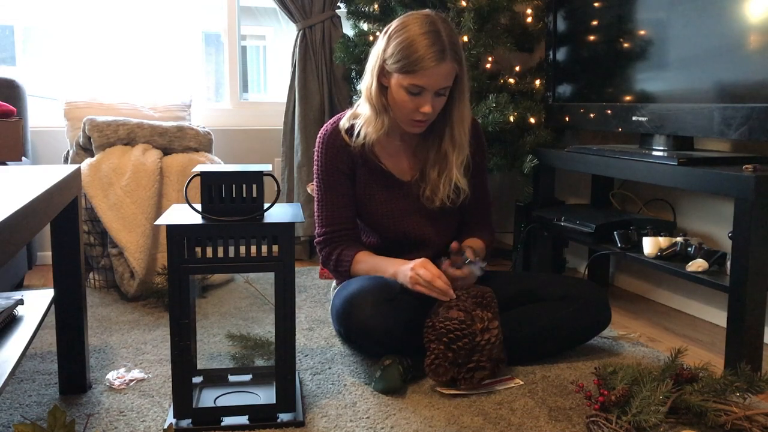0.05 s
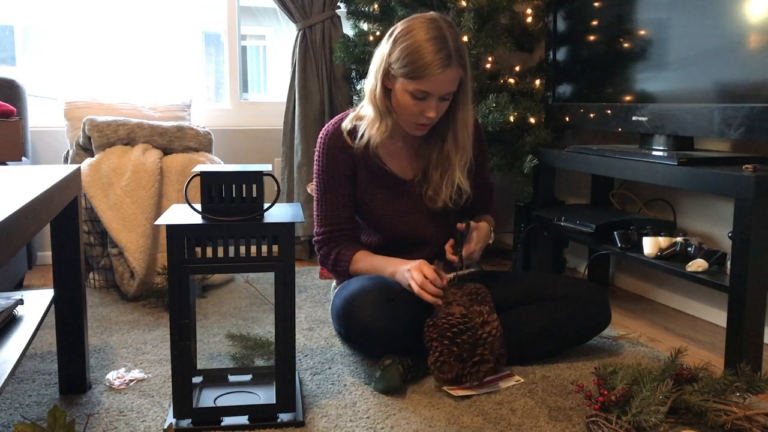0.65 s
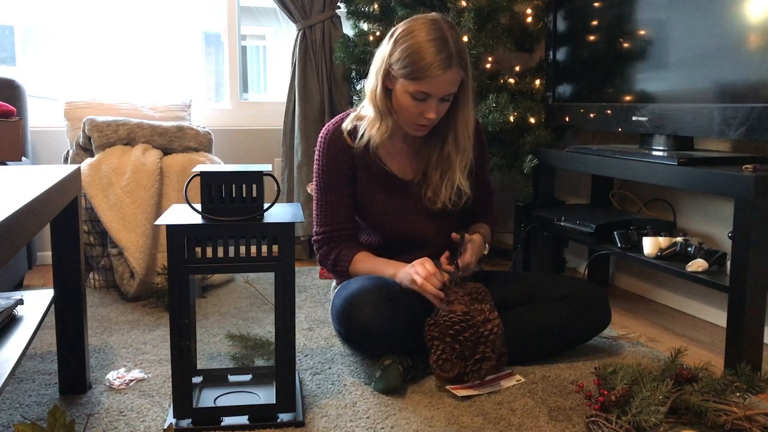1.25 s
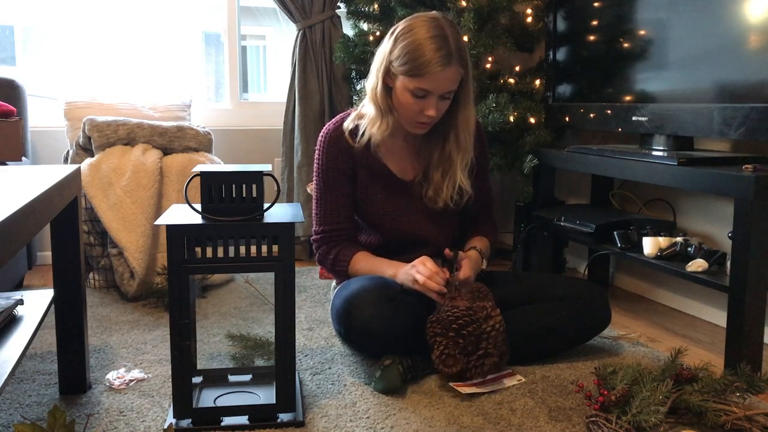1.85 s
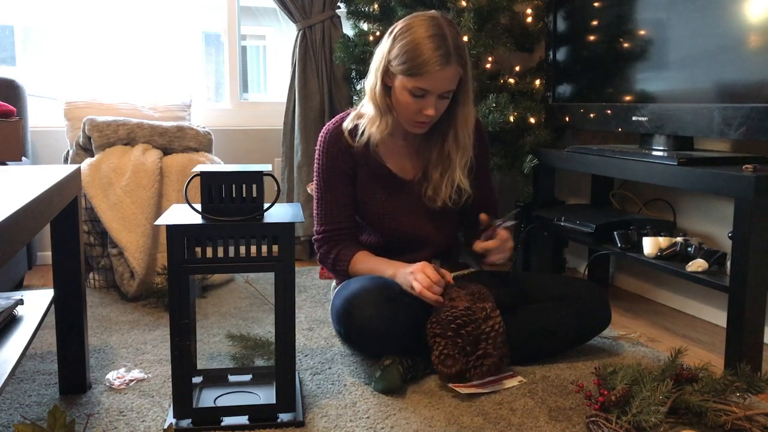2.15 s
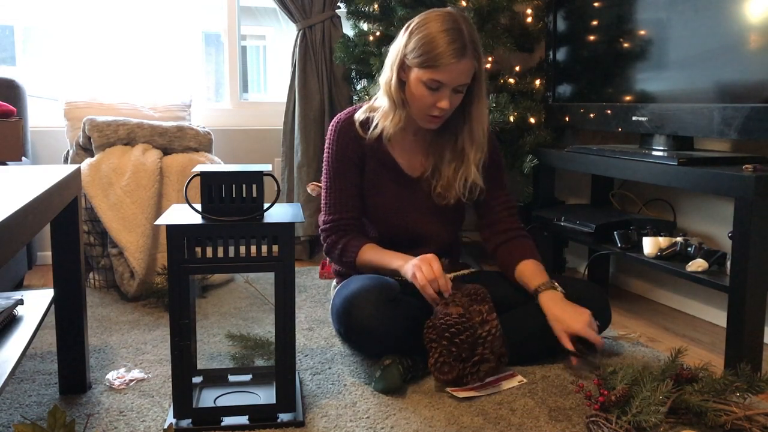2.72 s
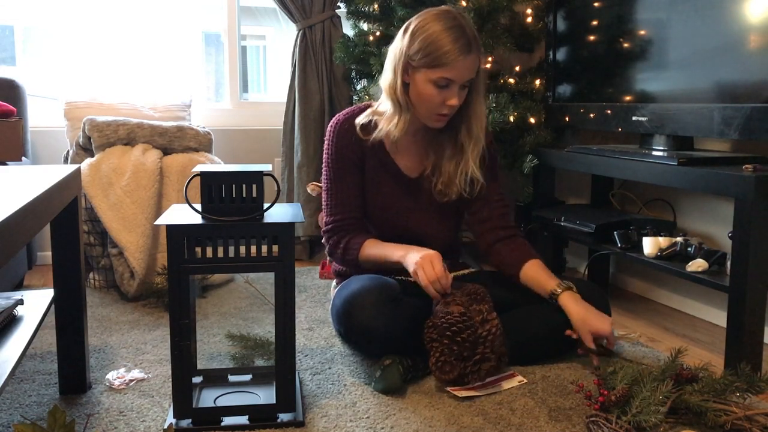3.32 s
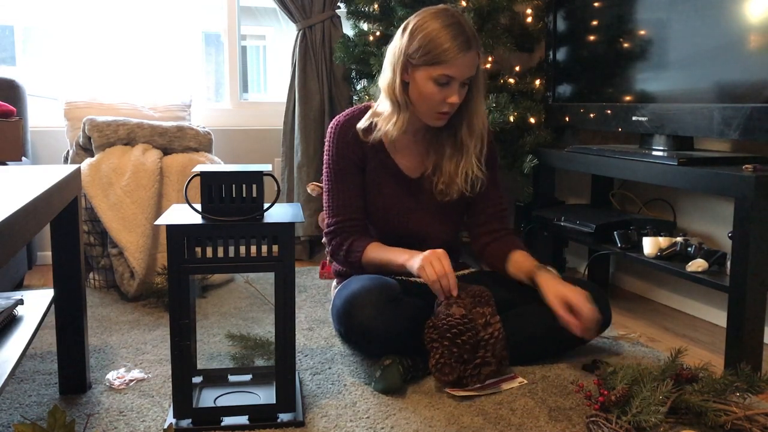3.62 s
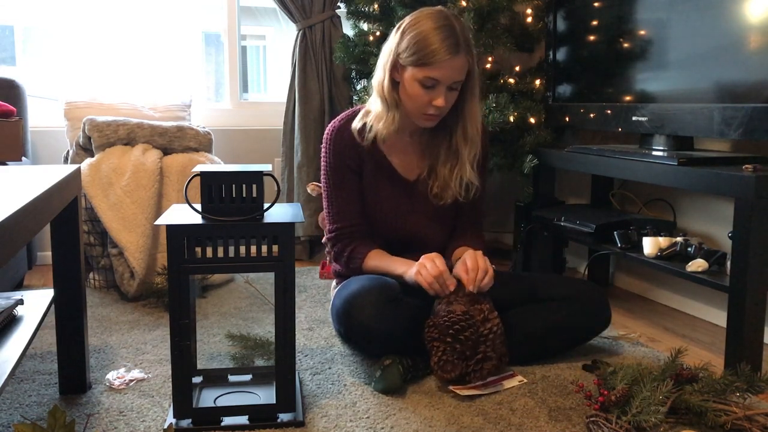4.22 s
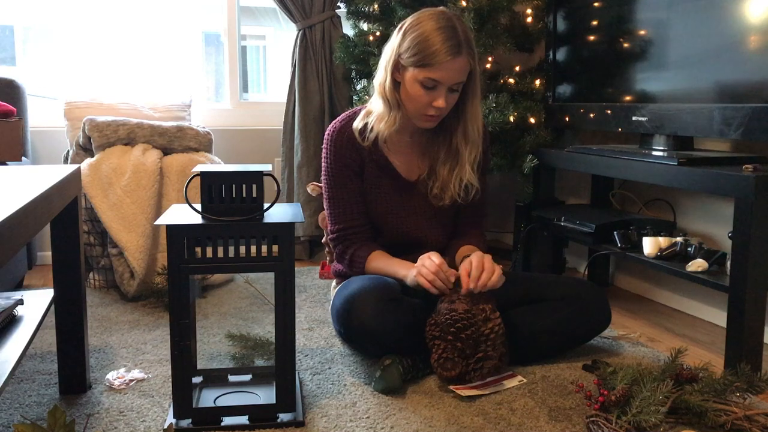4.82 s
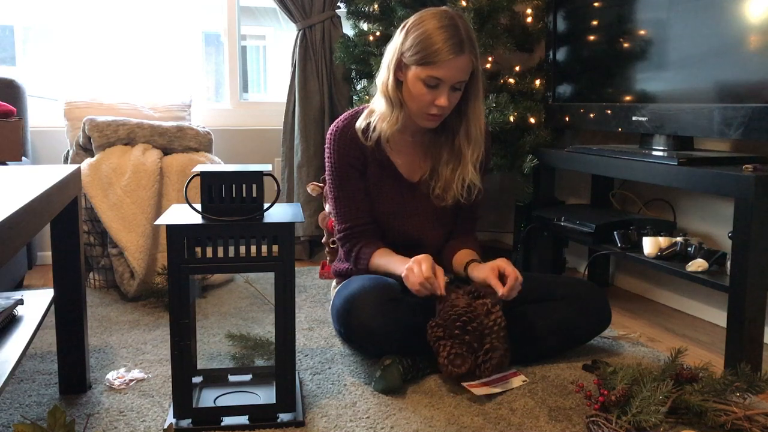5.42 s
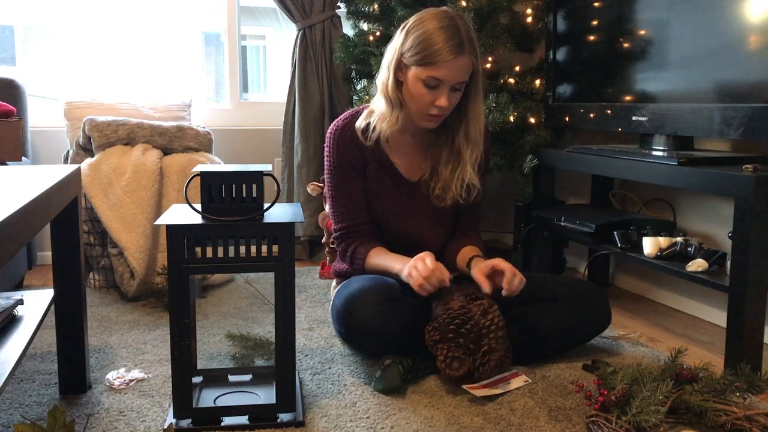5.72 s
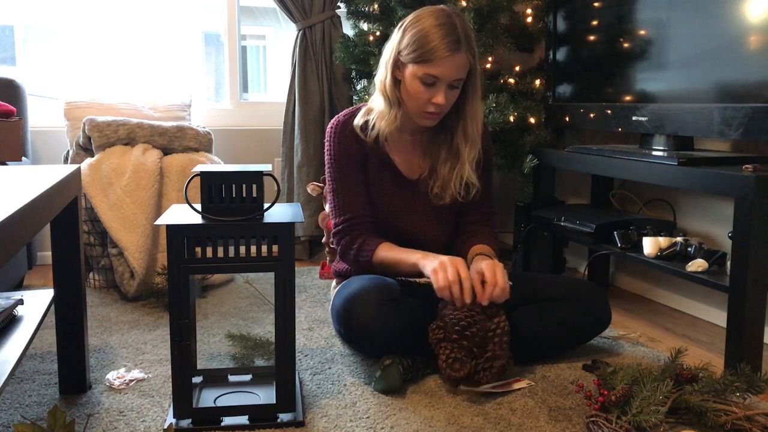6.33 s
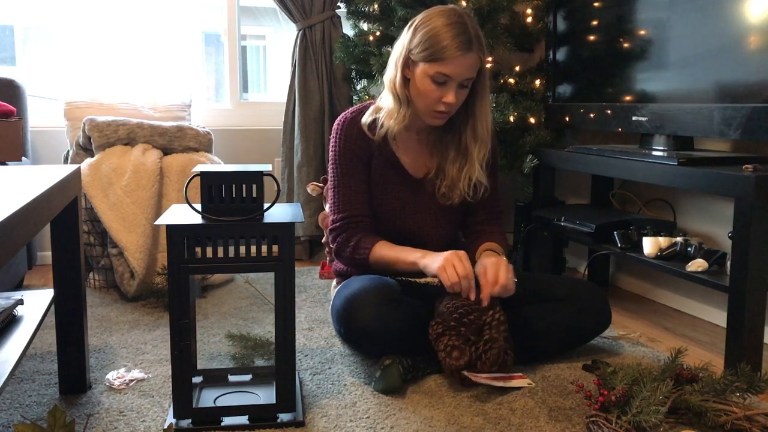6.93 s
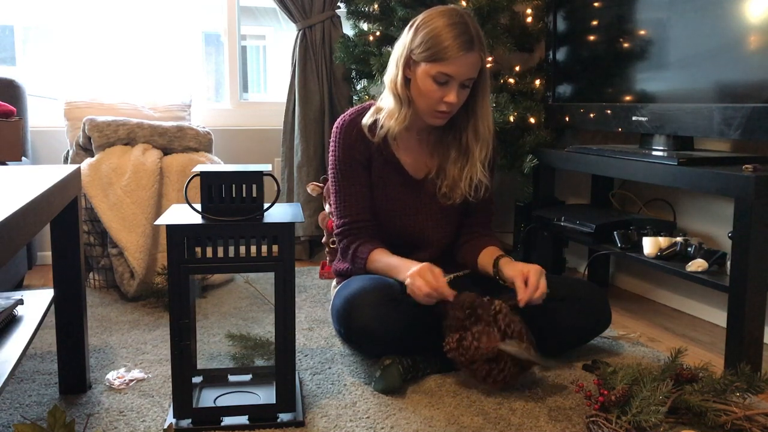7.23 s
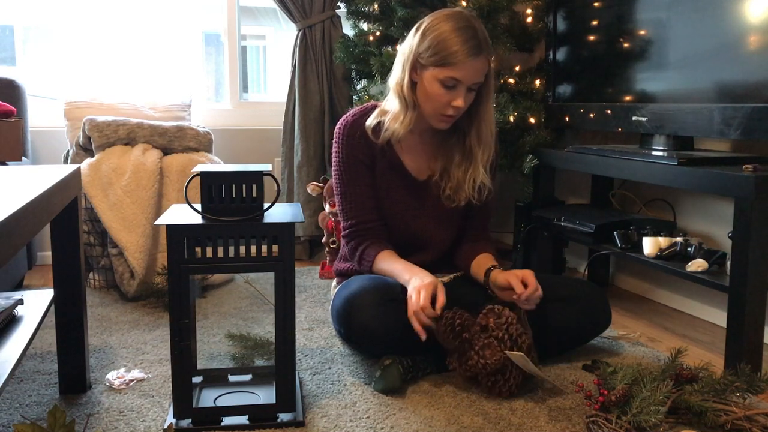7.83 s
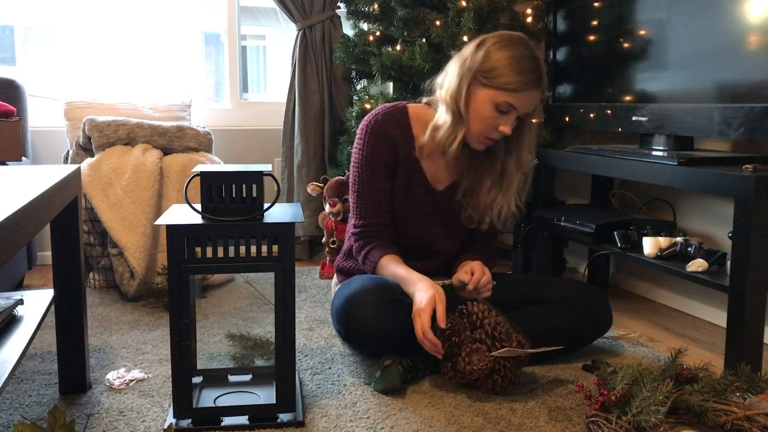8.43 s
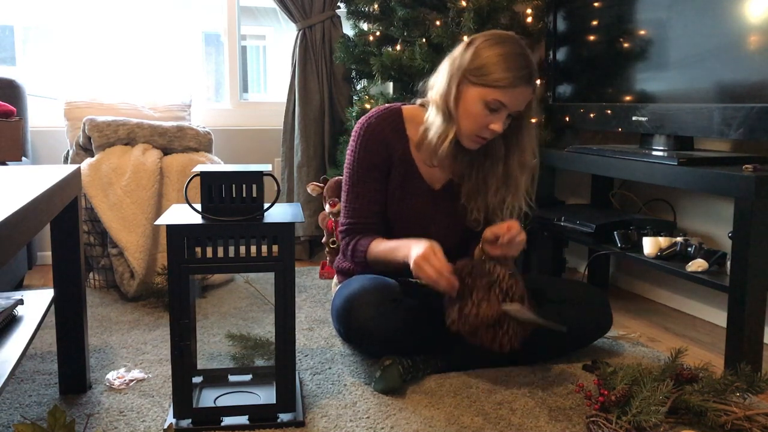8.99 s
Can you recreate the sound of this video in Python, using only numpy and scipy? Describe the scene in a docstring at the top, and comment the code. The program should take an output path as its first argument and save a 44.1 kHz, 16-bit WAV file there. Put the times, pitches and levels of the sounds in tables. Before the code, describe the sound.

A net bag of dry pine cones is handled softly and fairly nearby in a carpeted living room, over a faint hiss and a low, wavering hum. For the first four seconds there are scattered small snips, clicks and short scratchy rustles as scissors and fingers work at the knot, with a little cluster of clicks just before 3 seconds. Crisper snaps come at around 4.4 seconds. From 5.2 to 5.7 seconds a harder tug makes the mesh crackle over the scales while the cones shift. Lighter rustles and ticks follow. The loudest stretch runs from about 7.1 to 7.7 seconds: a quick run of bright, dry snaps and sizzling mesh, with the cones knocking softly together. It then eases into gentler rustling, a faint brush of sleeves and a few last clicks at around 9 seconds.

```python
"""Opening a net bag of pine cones

Someone snips at the knot of a net bag of dry pine cones, lays the scissors down and pulls the mesh open.
Strands and cone scales snap: each brief impulse excites a damped vibration and sets neighbours clattering.
The net crackles by stick-slip friction, the cones knock together, and sleeves and hands brush past.
A carpeted living room adds a short reverberation, a low wavering drone and faint hiss."""
import sys
import numpy as np
from scipy import signal
from scipy.fft import rfft, irfft
from scipy.io import wavfile

SR = 44100
rng = np.random.default_rng(int(sys.argv[2]) if len(sys.argv) > 2 else 0)


def transcribe(u):
    """Save the signal u as a 16-bit wav file named by the first command-line argument.

    u: samples, shape (n,) or (channels, n), limited to [-1, 1]; the rate is SR.
    q: integer samples, one column per channel.
    """
    v = np.clip(np.atleast_2d(u).T, -1, 1)
    q = np.round(v * 32767).astype(np.int16)
    wavfile.write(sys.argv[1], SR, q)


N = 403956
TIME = np.arange(N) / SR

# spectrum of the room air: (frequency [Hz], relative level [dB])
AIR_SPECTRUM = [(15, -35), (38, -7), (100, -2), (170, -8.5), (300, -8), (500, -16), (1000, -18),
                (2500, -26.5), (4200, -26.5), (6000, -30), (9000, -29), (10500, -33), (13000, -27.5),
                (16000, -31)]
# low room resonances: (frequency [Hz], half-width [Hz], level [dB])
ROOM_MODES = [(64, 25, -67.5), (90, 7.4, -64.5), (122.6, 8, -66), (263, 31, -72)]
# envelope of the room's drone: (time [s], relative level [dB])
DRONE_LEVELS = [(0, -72), (1.0, -63), (1.68, -46), (2.0, -59), (2.8, -75), (3.3, -54), (3.8, -60),
                (4.25, -52), (5.0, -67), (5.5, -56), (5.9, -62), (6.3, -52.5), (7.0, -63), (7.22, -46.5),
                (7.45, -69), (7.8, -51.5), (8.5, -50.5), (9.16, -59)]
# spectra of cloth, cones, net and snaps: (frequency [Hz], relative level [dB])
CLOTH_SPECTRUM = [(200, -11), (500, 3.5), (800, 9.5), (1500, 2.5), (3000, -6.5), (12000, -45)]
CONE_SPECTRUM = [(90, -27), (170, -8.5), (260, 0), (350, 0), (550, -3), (800, -9), (1400, -12.5),
                 (3000, -11.5), (8000, -20)]
NET_SPECTRUM = [(300, -11.5), (1000, -7), (1750, -6), (2600, -4.5), (3400, -2.5), (4200, 1.5), (5200, -5),
                (6200, -1.5), (7600, -6), (9400, -3.5), (10300, -10.5), (11600, -4), (16000, -12)]
SNAP_SPECTRUM = [(150, -14), (400, -17.5), (1200, -12.5), (1750, -7.5), (2600, -3.5), (3300, -1.5),
                 (4300, 2.5), (6000, -1.5), (7600, -2.5), (9400, -2), (10300, -6.5), (11500, -3.5),
                 (13500, -4), (16000, -8.5)]
# sleeves and hands brush past: (peak time [s], relative level [dB], rise [s], fall [s])
BRUSHES = [(.02, -66, .05, 0.038), (2.6, -73.5, 0.21, 1.5), (5.5, -70, 1.4, 1.1), (8.2, -60, 0.034, 0.17),
           (8.82, -63, 0.5, 0.28)]
# the cones shift in the bag: (peak time [s], relative level [dB], rise [s], fall [s])
CONE_SHIFTS = [(1.51, -56, 0.022, 0.036), (2.87, -53, 0.023, 0.015), (4.6, -59, 0.051, 0.034),
               (5.27, -48, 0.015, 0.044), (5.47, -58, 0.064, .05), (5.6, -52, 0.051, 0.035),
               (7.15, -49.5, 0.017, .1), (7.28, -47, 0.12, 0.23)]
# tugs slide the net over the scales; taut strands sizzle, slack ones sound duller:
# (peak time [s], relative level [dB], rise [s], fall [s], treble gain [dB])
TUGS = [(.02, -52.5, 0.095, 0.085, 0), (.23, -51, .02, 0.025, -2), (.46, -56.5, 0.068, 0.078, 3),
        (.58, -56.5, 0.021, 0.057, 6), (1.3, -56, 0.042, 0.05, 1), (1.51, -55.5, 0.056, 0.14, -2),
        (1.93, -51, .02, 0.046, -8), (2.08, -57.5, 0.036, 0.033, 8), (2.38, -56, 0.035, 0.13, -1),
        (2.6, -53, 0.11, 0.027, 0.5), (2.88, -61, 0.022, 0.073, 6), (3.54, -55.5, 0.045, 0.1, -3),
        (3.88, -55, 0.058, 0.032, -1), (4.08, -59.5, 0.037, 0.22, 2), (4.37, -49, 0.045, 0.064, -1),
        (4.73, -51, 0.059, 0.026, -4), (5.282, -38, 0.033, 0.029, -5), (5.48, -40, 0.035, 0.025, -2),
        (5.6, -39, .012, 0.08, -5), (6.159, -52.5, 0.03, 0.023, -1), (6.21, -53, 0.02, 0.02, -2),
        (6.36, -55.5, .015, 0.3, -3.5), (6.62, -47.5, 0.045, 0.074, -4), (6.9, -49.5, 0.05, 0.17, -2.5),
        (7.171, -44, 0.023, 0.14, 1), (7.38, -43, 0.14, 0.21, 3), (7.589, -36.5, 0.059, 0.028, 4),
        (7.81, -47, 0.12, 0.1, -4.5), (8.13, -47.5, 0.087, 0.073, -1), (8.309, -48.5, 0.068, 0.017, -5),
        (8.76, -53, .015, .05, 3), (8.84, -48, 0.043, 0.075, -2.5)]
# snaps of strands, cone scales and scissors: (time [s], level [dB], low-mid gain [dB],
# treble gain [dB], relative clatter level [dB], ring frequency [Hz], crack decay [s])
SNAPS = [(0.0136, -42, 6, 21, -20, 8300, 0.00031), (0.037, -48.5, 10, 2, -10, 9400, 0.00077),
         (0.2094, -42, 2, 5, 1.5, 6550, 0.0042), (0.445, -48.5, 8, 4, -8, 9220, 0.0013),
         (.628, -50, -23, 17, -1, 6600, .0003), (.736, -55.5, 4, -5, 5, 9170, 0.001),
         (.473, -43.5, 9, 7, -17, 8960, 0.0008), (.9335, -52.5, 0, 3, 4, 5250, 0.00056),
         (1.0145, -53.5, 10, 9, 1, 8180, .001), (1.148, -51.5, 7, 1, 0, 3200, 0.0018),
         (1.246, -53.5, 4, -6, -12, 10810, 0.0014), (1.455, -43, 0, 6, -10, 9140, 0.00056),
         (1.5, -39.5, 7, 3, 5.5, 4300, 0.00086), (1.822, -44.5, 5, -6, 6.5, 3450, 0.0014),
         (1.837, -47, -9, 13, -6, 3420, .0006), (1.91, -42.5, 9, -1, 1, 3240, .0022),
         (1.915, -43, 4, 3, 7, 12900, 0.0023), (2.071, -40.5, 3, 6.5, -5, 6850, 0.002),
         (2.726, -53, 1, -4, -8, 4400, .0012), (2.843, -45, -2, -2, 10, 5300, 0.0016),
         (2.853, -45, -3, -6, -2, 4600, 0.0008), (2.87, -40.5, -27, -9, 0, 4050, 0.0012),
         (2.88, -40.5, -4, -11, -16, 4600, 0.00053), (3.6567, -54, -8, 13, -12, 7110, 0.0014),
         (3.1248, -50.5, 4, -2, -7, 3500, 0.0023), (3.5352, -38, -14, 2, -11, 6600, 0.00046),
         (3.8766, -46.5, 13, 3, -4, 6300, 0.0016), (3.9848, -47.5, -2, -19, -12, 1990, 0.00064),
         (4.001, -46, 13, 4, 0, 6240, .0012), (4.0804, -51, -8, -20, -11, 3830, 0.00052),
         (4.3124, -46, 21, 16, 3, 8100, 0.0011), (4.339, -44.5, 15, 9, 8, 13820, 0.00065),
         (4.356, -41, 12, 10, -10, 12960, .0014), (4.3754, -38, -7, 7, -8, 8400, 0.00048),
         (4.3864, -36, 18, 14.5, -15, 12700, 0.00079), (4.5167, -38, 16, 8.5, -6, 7650, .0016),
         (4.5879, -38.5, 8.5, 4.5, -3.5, 7410, 0.0018), (4.7073, -47, -5, -18, -2, 4030, .0006),
         (4.951, -49.5, 8.5, 9, -1, 12320, .0004), (4.989, -53.5, 3, 0, -3, 12700, 0.00038),
         (5.262, -43, 1, 8, -8, 11460, .0015), (5.2245, -42.5, 8, 4, -12, 13100, .0014),
         (5.2386, -44, 8, 10, -5, 13180, 0.0011), (5.2511, -38.5, -6, 6, -2, 3000, .0018),
         (5.274, -39.5, 7, 8, 11, 7580, 0.0018), (5.2984, -36, 9, 6, -15, 8050, 0.0029),
         (5.3637, -39, 11, 4, 1, 11400, 0.0021), (5.4161, -35.5, 13, 2, -14, 4000, 0.0027),
         (5.4504, -33, 8, 0, -14, 4630, 0.0029), (5.4721, -35, 7, -4, -10, 9800, 0.0014),
         (5.5641, -31.5, 9, 1.5, -17, 4150, 0.0013), (5.579, -32, 6, 4, 3.5, 11800, .001),
         (5.5967, -29.5, 6, -1, -20, 4300, 0.0011), (5.641, -32, -26, -7, -19, 3920, 0.00053),
         (5.952, -41.5, 9, 7, -1, 6940, 0.0031), (6.2136, -50, -14, -8, -8, 6000, 0.00035),
         (6.5982, -39, -25, -33, 0, 4270, .0006), (6.603, -46, -18, -6, -6, 4000, .0003),
         (6.627, -48, -12, -8, 9.5, 6160, .0018), (6.7598, -36, -19, -15, -16, 11230, 0.00039),
         (6.8756, -41.5, -5, 0, -4, 6050, .0008), (7.1318, -40.5, 5, 4, 7.5, 2370, .0017),
         (7.151, -39, -1, -1, -3, 2450, .0014), (7.221, -37, 6, 5, 4, 9300, 0.0022),
         (7.168, -36, 0, 7, -13, 2480, 0.002), (7.1939, -34, 2, -5, -8, 11200, 0.0022),
         (7.245, -35, 0, -3, -3, 3600, 0.0018), (7.2622, -33.5, -1, 7, 2, 4660, .0015),
         (7.2794, -33.5, 0, 1, -3, 4600, 0.0015), (7.2965, -32.5, 1, 1, 3, 12920, 0.0012),
         (7.3213, -31, -4, 1, 4, 4300, 0.001), (7.3443, -25.5, -3, 9, -10, 4200, 0.00055),
         (7.3592, -27.5, -1, -8, -20, 4240, .0004), (7.3693, -25, -1, 5, -22, 4440, 0.00093),
         (7.3986, -28.5, 2, -3, -12, 12300, .0011), (7.4236, -26.5, -2, -5, -5, 2550, 0.00078),
         (7.4519, -24.5, 2, -6, -14, 4600, 0.00073), (7.485, -27, 4, 1, -6, 2650, .0014),
         (7.517, -26.5, -3, -2, -10, 2650, 0.00077), (7.5221, -29.5, 6, 4, -2, 13100, 0.00074),
         (7.533, -35, -1, -14, -12, 5170, .0003), (7.5547, -25.5, -9, -12, -2, 2680, .0009),
         (7.575, -27, 1, 3, 2, 11400, 0.0034), (7.612, -30.5, 7, -7, -4, 4950, 0.00024),
         (8.017, -46, -22, -16, -12, 3200, .0012), (8.1492, -45, -6, 13, -12, 12600, .0008),
         (8.155, -41.5, -13, -31, -13, 4370, 0.0011), (8.191, -48, -8, 10, -10, 12800, .0007),
         (8.3084, -44.5, -1, -8, -15, 4500, .0013), (8.809, -43.5, 8, -4, -2.5, 3260, 0.0023),
         (9.018, -53, -17, -11, 1, 7700, .0005), (9.1008, -44, 9, 4, -24, 11600, 0.0015)]


def undb(db):
    """Amplitude ratio of a level in decibels."""
    return 10 ** (np.asarray(db) / 20)


def unit_rms(x):
    """Normalisation to mean power 1."""
    return x / np.sqrt(np.mean(x ** 2))


def unit_energy(x):
    """Normalisation to total energy 1."""
    return x / np.sqrt(np.sum(x ** 2) + 1e-18)


def spectrum_db(hz, spectrum):
    """Level interpolated on a logarithmic frequency axis."""
    f, db = np.transpose(spectrum)
    return np.interp(np.log(hz + 1), np.log(f), db)


def response(spectrum, size=1024):
    """Minimum-phase impulse response of a body with the given spectrum."""
    hz = np.arange(size // 2 + 1) * SR / size
    cepstrum = irfft(np.log(undb(spectrum_db(hz, spectrum))))
    cepstrum[1:size // 2] *= 2  # folding the cepstrum makes the response causal
    cepstrum[size // 2 + 1:] = 0
    return unit_energy(irfft(np.exp(rfft(cepstrum))))


def through(x, impulse_response):
    """Convolution: a sound passes through a linear system."""
    return signal.oaconvolve(x, impulse_response)[:len(x)]


def resonance(hz, half_width_hz):
    """A resonance driven by noise gives a narrow band, here of rms 1."""
    f = np.arange(N // 2 + 1) * SR / N
    return unit_rms(irfft(rfft(rng.standard_normal(N)) / (1 + ((f - hz) / half_width_hz) ** 2), N))


def damped_mode(hz, decay_s, t):
    """Free vibration of a stiff body: a decaying sinusoid of energy 1."""
    return unit_energy(np.sin(2 * np.pi * hz * t) * np.exp(-t / decay_s))


def impulses(per_s, spread_db, size):
    """Shot noise: random impulses, many weak and a few strong, of mean power near 1."""
    chance = np.clip(per_s / SR, 1e-6, 1)
    strength = unit_rms(undb(spread_db * np.minimum(rng.exponential(size=size), np.pi)))
    return (rng.random(size) < chance) * rng.choice([-1, 1], size) * strength / np.sqrt(chance)


def swell(peak_s, db, rise_s, fall_s):
    """Exponential growth and decay of one movement."""
    return undb(db) * np.exp(-np.maximum((peak_s - TIME) / rise_s, (TIME - peak_s) / fall_s))


def movements(rows):
    """Incoherent addition: the powers of overlapping movements sum to one envelope."""
    return np.sqrt(sum(swell(*row) ** 2 for row in rows) + 1e-18)


def background(air_db=-58.5, drone_hz=103.0, hiss_hz=12200, hiss_db=-76):
    """Ambient noise: steady air and hiss, rumble in the room modes and a frequency-modulated drone."""
    f = np.arange(N // 2 + 1) * SR / N
    air = unit_rms(irfft(rfft(rng.standard_normal(N)) * undb(spectrum_db(f, AIR_SPECTRUM)), N))
    rumble = sum(undb(db) * resonance(hz, width) for hz, width, db in ROOM_MODES)
    waver_hz = 2.536 * resonance(0, 2.03)
    phase = 2 * np.pi * np.cumsum(drone_hz + waver_hz) / SR
    envelope = undb(np.interp(TIME, *np.transpose(DRONE_LEVELS)) - 3)
    drone = envelope * (np.sqrt(2) * np.sin(phase) + 0.16 * resonance(drone_hz, 5.9))
    return undb(air_db) * air + rumble + drone + undb(hiss_db) * resonance(hiss_hz, 350)


def room_response(early_db=-6, early_s=0.0084, tail_db=-5, t60_s=0.32, treble_t60_s=0.29):
    """Reverberation: early reflections off the furniture, then a tail that loses its treble first."""
    t = np.arange(SR // 3) / SR
    onset = np.clip((t - .002) / 0.00033, 0, 1)
    early = unit_energy(impulses(3000, 3.3, len(t)) * onset * np.exp(-t / early_s))
    low = signal.lfilter(*signal.butter(2, 6500, fs=SR), rng.standard_normal(len(t)))
    high = signal.lfilter(*signal.butter(2, 6500, "high", fs=SR), rng.standard_normal(len(t)))
    tail = low * undb(-60 * t / t60_s) + 0.66 * high * undb(-60 * t / treble_t60_s)
    return undb(early_db) * early + undb(tail_db) * unit_energy(tail * onset)


def in_room(x):
    """Superposition of the direct sound and its reflections."""
    return x + through(x, room_response())


def cloth(slips_per_s=5000, gain_db=-2):
    """Sliding friction: fibres slip in a dense, soft stream."""
    slips = impulses(slips_per_s, 1.5, N) * movements(BRUSHES)
    return undb(gain_db) * through(slips, response(CLOTH_SPECTRUM))


def cones(knocks_per_s=500, gain_db=-1):
    """Impact excitation: light woody cores knock together as the bag rolls."""
    knocks = impulses(knocks_per_s, 10.6, N) * movements(CONE_SHIFTS)
    return undb(gain_db) * through(knocks, response(CONE_SPECTRUM))


def pull(hold_db=-70):
    """Power summation of the tugs gives the fingers' effort and a power-weighted treble gain."""
    power = treble = undb(hold_db) ** 2  # the net creaks faintly even when only held
    for peak_s, db, rise_s, fall_s, treble_db in TUGS:
        tug_power = swell(peak_s, db, rise_s, fall_s) ** 2
        power = power + tug_power
        treble = treble + tug_power * undb(treble_db)
    return np.sqrt(power), treble / power


def scale_tips(effort, per_s=22, low_hz=2400, high_hz=10000, decay_s=.0003, gain_db=-5):
    """Plucking: scale tips flick free of the mesh at random, each ringing at its natural frequency."""
    t = np.arange(512) / SR
    strain = np.minimum(effort, undb(-56))
    out = np.zeros(N + len(t))
    for when, pitch, force in rng.random((int(per_s * N / SR), 3)):
        start = int(when * N)
        flick = damped_mode(low_hz * (high_hz / low_hz) ** pitch, decay_s, t)
        out[start:start + len(t)] += strain[start] * undb(15.24 * force ** 2 - 9) * flick
    return undb(gain_db) * np.sqrt(SR / per_s) * in_room(out[:N])


def net(effort, treble_gain, decay_s=0.00084, scrape_db=-11, gain_db=-3, scale_count=8):
    """Stick-slip friction: strands catch on differently tuned scales, more often under a harder pull."""
    t = np.arange(256) / SR
    catches_per_s = 600 * effort / undb(-53.5) + 150
    crackle = np.zeros(N)
    for _ in range(scale_count):
        scale_response = unit_energy(rng.standard_normal(len(t)) * np.exp(-t / decay_s))
        catches = impulses(catches_per_s / scale_count, 3.0, N) * effort
        crackle += in_room(through(catches, scale_response))
    scrape = undb(scrape_db) * effort * rng.standard_normal(N)
    sliding = crackle / np.sqrt(scale_count) + scrape
    dull = signal.sosfiltfilt(signal.butter(2, 6500, fs=SR, output="sos"), sliding)
    return undb(gain_db) * through(dull + treble_gain * (sliding - dull), response(NET_SPECTRUM))


def snaps(ring_s=.0012, clatter_rise_s=0.0081, clatter_fall_s=0.019, echo_db=-1, ring_echo_db=-4):
    """Impulsive excitation: a crack rings a heavily damped scale or blade and rattles its neighbours."""
    size = SR // 3
    t = np.arange(size) / SR
    out = np.zeros(N + size)
    hz, wood_db = np.transpose(SNAP_SPECTRUM)
    low_shelf = 1 / (1 + (hz / 3000) ** 4)
    high_shelf = 1 / (1 + (7000 / hz) ** 4)
    clatter_envelope = np.exp(-t / clatter_fall_s) * (1 - np.exp(-t / clatter_rise_s))
    for time_s, db, low_db, high_db, clatter_db, ring_hz, crack_s in SNAPS:
        body = response(np.transpose([hz, wood_db + low_db * low_shelf + high_db * high_shelf]))
        age = t / crack_s  # a fracture spreads, then runs out
        crack = unit_energy(impulses(20000, 3.3, size) * np.sqrt(age) * np.exp(-age))
        clatter = unit_energy(impulses(2000, 8.7, size) * clatter_envelope)
        direct = crack + undb(clatter_db - 4) * clatter
        reflections = room_response()  # each snap comes from another spot, with its own reflections
        echoes = undb(echo_db) * np.linalg.norm(direct) * reflections
        ring = damped_mode(ring_hz, ring_s, t)
        ring_echoes = through(undb(ring_echo_db) * reflections, ring[:len(body)])
        ring_gain = undb(-5) * (ring_s / crack_s) ** 0.33  # the quicker the crack, the more it rings
        snap = through(direct + echoes, body) + ring_gain * (ring + ring_echoes)
        # the level is roughly the snap's energy averaged over 4.7 ms
        gain = undb(db) * np.sqrt(0.0047 * SR) / np.hypot(1, ring_gain)
        start = int(time_s * SR)
        out[start:start + size] += gain * snap
    return out[:N]


def scene():
    """Superposition of the handled bag and the room's ambient noise, in one channel."""
    effort, treble_gain = pull()
    bag = snaps() + net(effort, treble_gain) + scale_tips(effort) + in_room(cones() + cloth())
    return (bag + background())[None]


def record(dry, cutoff_hz=15950):
    """Band limiting: a steep elliptic low-pass removes the highest treble."""
    return signal.sosfilt(signal.ellip(10, .2, 80, cutoff_hz, fs=SR, output="sos"), dry)


dry = scene()
out = record(dry)
transcribe(out)
```